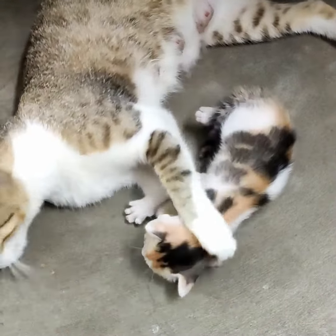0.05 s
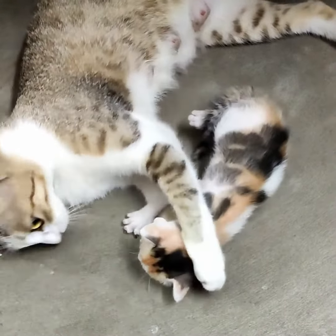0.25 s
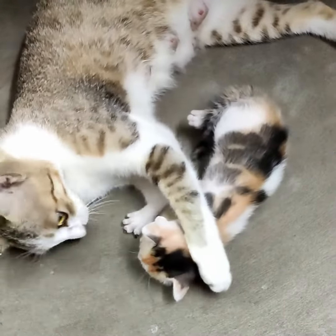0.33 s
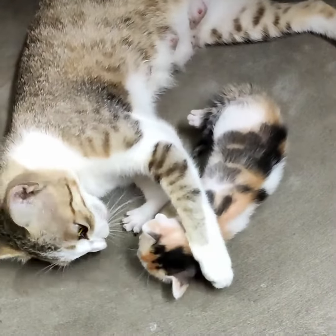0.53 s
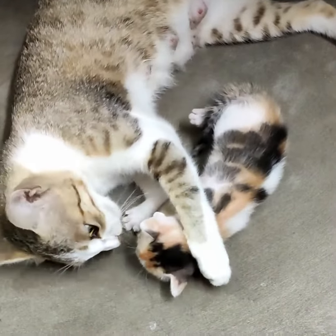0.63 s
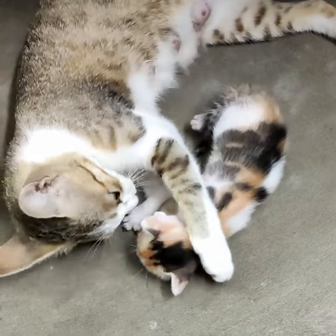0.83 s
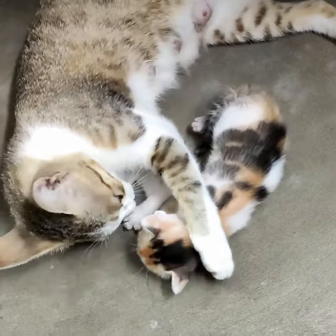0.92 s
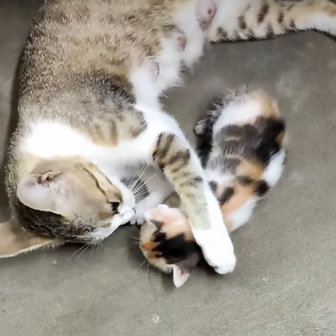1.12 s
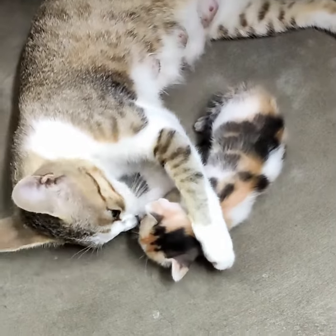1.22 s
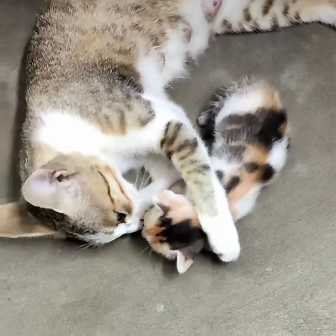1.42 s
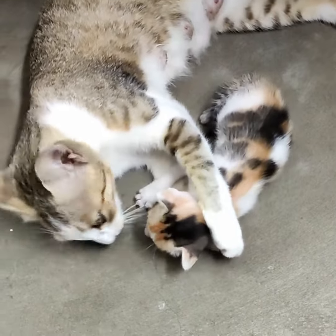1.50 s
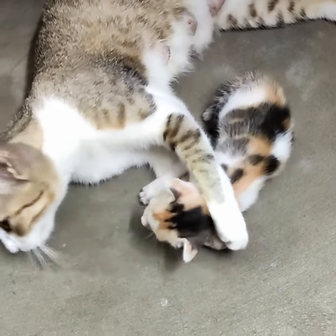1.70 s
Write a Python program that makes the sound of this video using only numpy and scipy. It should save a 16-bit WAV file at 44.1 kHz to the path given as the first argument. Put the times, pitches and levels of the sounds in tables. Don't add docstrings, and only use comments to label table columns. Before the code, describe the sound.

One soft cat greeting, a fluttering closed-mouth trill rising to a brief 'ah', then falling away

```python
import sys
import numpy as np
from scipy import signal
from scipy.fft import rfft, irfft, next_fast_len
from scipy.io import wavfile
from scipy.ndimage import uniform_filter1d, map_coordinates

SR = 44100
rng = np.random.default_rng(int(sys.argv[2]) if len(sys.argv) > 2 else 0)


def gain_from_db(level_db):
    decades = np.asarray(level_db, float) / 20
    return 10 ** decades


def file_out(sig):
    cols = np.atleast_2d(sig).T
    lim = np.clip(cols, -1, 1)
    pcm = np.round(lim * 32767).astype(np.int16)
    wavfile.write(sys.argv[1], SR, pcm)


N = 77175

STEADY_FROM_S, STEADY_TO_S, SETTLE_S = .378, .8, .018

# t/s, pitch f/Hz, level/dB, mouth opening/0-1, tilt/dB per octave
TRILL = [
    (.085, 450, -60, 0.2, -10.5),
    (.103, 445.1, -44, 0.2, -17),
    (.135, 441.2, -44.5, 0.06, -3),
    (.17, 447.3, -43, 0.06, -4.5),
    (.195, 445, -43, 0, -3.5),
    (.22, 458, -38, 0.1, -0.5),
    (.27, 457.8, -38.5, 0.07, 2),
    (.32, 462.4, -37.5, 0.05, 0),
    (.35, 466.3, -37.5, 0.08, -0.5),
]
HUM = [
    (0.376, 475, -35.5, 0.0055, 0.5),
    (0.403, 502.7, -28, 0.03, 3),
    (.43, 522.7, -28.5, 0, 1.5),
    (0.473, 535.6, -27, 0.0053, 2.5),
    (.488, 534.7, -36, 0.0055, 9.5),
    (0.502, 536.3, -41, 0.00072, -5),
    (.52, 548, -44, .05, -8),
]
OPEN = [
    (.535, 574.4, -45.5, 0.45, -7),
    (.555, 584, -41, 0.68, -1.5),
    (.567, 600.4, -34, 0.78, -3),
    (0.575, 609, -26, 0.97, -1),
    (.583, 614.4, -23, 1, -2),
    (.601, 612, -29, 0.96, -3),
    (.611, 591.5, -35, 0.78, -2),
    (.622, 588.4, -37, 0.85, 1.5),
    (0.646, 585.3, -45, 0.55, -11),
]
CLOSE = [
    (.663, 572, -37, 0.26, -1),
    (0.711, 545.2, -35.5, 0.2, -3.5),
    (0.757, 527.5, -36, 0.052, -3),
    (0.769, 520, -41, 0.028, -6),
    (0.795, 500, -41, 0.035, -2),
    (0.808, 492, -38, 0.029, -11),
    (.828, 440, -47, 0.017, -7),
    (.856, 440, -56, 0, -14),
    (.88, 505, -53, 0, -14),
]


def mother():
    t = np.arange(N) / SR
    pitch, level_db, mouth, tilt_db = curves(TRILL + HUM + OPEN + CLOSE)
    mouth = np.clip(mouth, 0, 1)
    steady = np.clip(np.minimum(t - STEADY_FROM_S, STEADY_TO_S - t) / SETTLE_S + .5, 0, 1)
    calm = np.minimum(steady, np.clip((t - STEADY_FROM_S) / .016, 0, 1))
    bursts = throat_flaps(t)
    gap_db = -8.5
    gate = steady + (1 - steady) * np.hypot(gain_from_db(gap_db), bursts)

    faint_db, faint_shakes = -36, .3
    shaky = 1 + faint_shakes * steady * np.clip(faint_db - level_db, 0, None)
    jitter, trill_jitter, flap_bend = .003, .026, .07
    sag = flap_bend * (np.minimum(bursts, 1) - 1)
    rolled = (1 - steady) * (sag + trill_jitter * wobble(150))
    pitch = pitch * (1 + jitter * shaky * wobble(91.1) + rolled)
    phase = 2 * np.pi * np.cumsum(pitch) / SR

    veil_db, unveil_s = -8, .09
    veil_db = veil_db * steady * np.clip(1 - (t - STEADY_FROM_S) / unveil_s, 0, 1)
    shimmer_db = 1.1
    phase_spread = 1.4
    overtone_chop = 2.1
    tones, power = np.zeros(N), np.zeros(N)
    for k in range(1, 15):
        db = mouth_db(k, pitch, mouth, t, calm, veil_db) + tilt_db * np.log2(min(k, 3))
        gain = gain_from_db(db + shimmer_db * shaky * wobble(59.7))
        chopped = gate ** (overtone_chop if k > 1 else 1)
        tones = tones + gain * chopped * np.cos(k * phase - phase_spread * k * k)
        power = power + gain ** 2 / 2
    voice = tones / np.sqrt(uniform_filter1d(power, size=600))

    shut_breath_db = -27.5
    open_breath_db = -23 + (level_db.max() - level_db)
    steady_breath_db = (1 - mouth) * shut_breath_db + mouth * open_breath_db
    rolled_breath_db = -8.5 - 10.0 * (t > STEADY_TO_S - SETTLE_S)
    share = gain_from_db(calm * steady_breath_db + (1 - calm) * rolled_breath_db)
    sounding = (t > TRILL[0][0]) * (t < CLOSE[-1][0])
    return gain_from_db(level_db) * sounding * (voice + share * gate ** 0.11 * breath(phase, mouth))


# t/s of each burst, level/dB, half length/s
FLAPS = [(0.112, 2, 0.0079), (0.135, -1.5, 0.0049), (0.151, 0, 0.0048), (0.17, 2, 0.00695),
         (.203, -3, 0.00489), (.217, 0.5, 0.00599), (0.247, 1, .0045), (0.272, -0.5, 0.00504),
         (.294, 1, 0.00503), (0.320, 1.5, 0.00449), (0.344, 1.5, 0.0052), (.369, 1, 0.00603),
         (0.807, 0, .005), (0.821, 0, 0.0027), (.862, -2.5, .004), (0.870, 3, .004)]


def throat_flaps(t):
    return sum(gain_from_db(db) * np.exp(-.5 * ((t - s) / half_s) ** 2) for s, db, half_s in FLAPS)


# f/Hz, level/dB
SHUT = [(400, 0.5), (540, -10.5), (1000, 0), (1400, -19), (1850, -9), (2400, -34), (3700, -38.5),
        (5400, -54.5)]
# f/Hz, level/dB
WIDE = [(600, -18), (1200, -6.5), (1800, -9.5), (2500, 3.5), (3500, -2.5), (4900, -27.5), (6900, -28.5),
        (8600, -45)]
# t/s, frequency shift/ratio
TONGUE = [
    (.55, 0.97),
    (.575, 1),
    (.6, 1.02),
    (.618, 1.13),
    (.64, 1.03),
    (.67, 1),
]


def mouth_db(k, pitch, mouth, t, calm, veil_db):
    hz = k * pitch
    hum_clears_db = -12.5
    shut_db = along(SHUT, hz) + (k in (3, 4)) * calm * hum_clears_db + (k > 4) * veil_db
    fizz_hz, fizz_width_hz = 4550, 400
    fizz_db = 13 * np.interp(t, (.38, .46), [1, 0])
    shut_db = shut_db + fizz_db * np.exp(-.5 * ((hz - fizz_hz) / fizz_width_hz) ** 2)
    (shift,) = curves(TONGUE)
    wide_db = along(WIDE, hz / (shift if k > 3 else 1))
    return (1 - mouth) * shut_db + mouth * wide_db


# f/Hz, level/dB per Hz
NOSE = [(190, -40.5), (330, 3.5), (750, 0.5), (1300, 2.5), (1900, -5), (2600, -27.5), (4700, -12.5),
        (5600, -34)]
# f/Hz, level/dB per Hz
PANT = [(400, -26), (1400, -5), (2000, -16.5), (3000, 1), (4200, -5), (5500, -18), (7300, -11), (8600, -29)]


def breath(phase, mouth):
    def coloured(air, points):
        ends = [(100, -65.5)] + points + [(10000, -82.5)]
        return unit(filtered(air, lambda hz: gain_from_db(along(ends, hz))))

    air = rng.standard_normal((2, N)) * (1 + np.cos(phase))
    return (1 - mouth) * coloured(air[0], NOSE) + mouth * coloured(air[1], PANT)


# t/s, pitch f/Hz, level/dB
KITTEN = [
    (.11, 1260, -76),
    (.125, 1217, -56),
    (.15, 1192, -55),
    (.205, 1230, -51),
    (.25, 1265, -58),
    (.29, 1248, -58),
    (.325, 1216, -56),
    (.34, 1200, -82),
]
KITTEN_DB = [3, -2.5, -7.5]


def kitten():
    pitch, level_db = curves(KITTEN)
    dulling_db_per_s = 39
    fade_db = dulling_db_per_s * (np.arange(N) / SR - KITTEN[0][0])
    phase = 2 * np.pi * np.cumsum(pitch * (1 + 0.0091 * wobble(50))) / SR
    tones = sum(gain_from_db(db - (k > 1) * fade_db) * np.sin((k + 1) * phase) for k, db in enumerate(KITTEN_DB))
    return gain_from_db(level_db + 1.5 * wobble(40)) * (level_db > -79) * tones


# t/s, level/dB, rise/s, t60/s
SMACKS = [
    (.5195, -39.5, .0005, 0.016),
]
# f/Hz, level/dB per Hz
SMACK = [(800, -6), (1500, -0.5), (2200, -7.5), (3300, 0.5), (5200, -5.5), (6200, -20), (9000, -35.5)]
# t/s, level/dB, rise/s, t60/s
LIP_AIR = [
    (.521, -53, 0.0047, 0.12),
]
# f/Hz, level/dB per Hz
HISS = [(1000, -11.5), (3000, -6.5), (5500, -10), (6900, 0.5), (8100, -21.5), (10000, -20), (12500, -13),
        (15500, -13.5)]


def lips():
    return puffs(SMACKS, SMACK) + puffs(LIP_AIR, HISS)


# t/s, level/dB, rise/s, t60/s
BRUSHES = [
    (1.177, -49.5, 0.0012, .03),
    (1.182, -52.5, 0.0073, 0.11),
    (1.42, -55.5, 0.032, .3),
]
# f/Hz, level/dB per Hz
FUR = [(800, -27), (2000, 2.5), (4000, -1.5), (6800, 0.5), (8000, -22), (15000, -26)]


def fur():
    return puffs(BRUSHES, FUR)


def puffs(rows, spectrum):
    t = np.arange(N) / SR
    shape = np.zeros(N)
    for s, db, rise_s, t60_s in rows:
        age = np.maximum(t - s, 0)
        shape = shape + gain_from_db(db - 60 * age / t60_s) * (1 - np.exp(-age / rise_s))
    noise = filtered(rng.standard_normal(N), lambda hz: gain_from_db(along(spectrum, hz)))
    return shape * gain_from_db(1.5 * wobble(300)) * unit(noise)


# f/Hz, t60/s
ROOM = [(300, .3), (1500, 0.39), (3200, 0.21), (7000, 0.51)]
# f/Hz, level/dB
ROOM_COLOUR = [(400, -4), (1100, -6), (2200, 0), (8000, 0)]


def room(x):
    _, t, z = signal.stft(rng.standard_normal((2, SR // 2)), SR, nperseg=256)
    hz = np.fft.rfftfreq(256, 1 / SR)
    tail = signal.istft(z * gain_from_db(-60 * t / along(ROOM, hz)[:, None]), SR, nperseg=256)[1]
    tail = tail / np.linalg.norm(tail, axis=1, keepdims=True)
    late = np.pad(x, (int(.004 * SR), 0))[None]
    wet = signal.fftconvolve(late, tail, axes=1)[:, :N]
    return filtered(wet, lambda hz: gain_from_db(along(ROOM_COLOUR, hz)))


# f/Hz, level/dB per Hz
AIR = [(150, -20.5), (230, -13), (400, -6.5), (1300, -11.5), (2500, -20), (7000, -30), (7800, -40),
       (15500, -54)]
# f/Hz, level/dB per Hz
RUMBLE = [(18, -3), (28, -0.5), (48, -6), (80, 0), (120, -6), (170, -0.5), (210, -5), (300, -31.5)]


def background():
    air_db, rumble_db, air_lag_s = -54, -63, .00037
    hiss = gain_from_db(air_db + 0.43 * wobble(4.5)) * rush(AIR, air_lag_s, patchy_db=1.5)
    rumble = gain_from_db(rumble_db + wobble(6.6)) * rush(RUMBLE, 0, patchy_db=1.0)
    return hiss + rumble + drone()


# f/Hz, correlation/0-1
ALIKE = [(60, 1), (200, 0.92), (600, .7), (1700, 0.17), (5000, 0.13), (15000, 0.067)]
# f/Hz, left over right level/dB
LEAN = [(60, 2.5), (300, -1.5), (1000, 2), (4000, 4), (10000, 1.5)]


def rush(spectrum, lag_s, patchy_db):
    z = signal.stft(rng.standard_normal((2, N)), nperseg=512)[2]
    field = uniform_filter1d(uniform_filter1d(rng.standard_normal(z.shape[1:]), 6, 0), 12, 1)
    pair = signal.istft(z * gain_from_db(patchy_db * unit(field)), nperseg=512)[1][:, :N]

    def mid_side(hz):
        angle = np.arccos(np.clip(along(ALIKE, hz), -1, 1)) / 2
        return gain_from_db(along(spectrum, hz)) * [np.cos(angle), np.sin(angle)]

    mid, side = filtered(pair, mid_side)
    return unit(placed(np.array([mid + side, mid - side]), LEAN, lambda hz: 2 * np.pi * hz * lag_s))


# f/Hz, level/dB
DRONE = [(80, -71.5), (167, -72.5)]


def drone():
    t = np.arange(N) / SR
    hum = np.zeros(N)
    for hz, db in DRONE:
        level = np.sqrt(2) * gain_from_db(db + 3.3 * wobble(6.45))
        hum = hum + level * np.sin(2 * np.pi * hz * t + 0.52 * wobble(9.8))
    return hum


def unit(x):
    return x / np.sqrt(np.mean(x ** 2) + 1e-20)


def along(points, hz):
    f, v = np.transpose(points)
    return np.interp(np.log(hz + 1), np.log(f + 1), v)


def curves(rows):
    s, *cols = np.transpose(rows)
    return [np.interp(np.arange(N) / SR, s, c) for c in cols]


def wobble(rate):
    knots = rng.standard_normal(int(N * rate / SR) + 4)
    return map_coordinates(knots, [np.arange(N) * rate / SR])


def filtered(x, response):
    m = next_fast_len(N + 8192)
    return irfft(rfft(x, m) * response(np.fft.rfftfreq(m, 1 / SR)), m)[..., :N]


def placed(pair, lean, turn):
    side = np.array([[.5], [-.5]])
    return filtered(pair, lambda hz: gain_from_db(side * along(lean, hz)) * np.exp(-1j * turn(hz) * side))


# f/Hz, left over right level/dB
CAT_LEAN = [(500, 2.5), (1100, 1.5), (1800, -1.5), (2500, -1.5), (3060, 12), (3700, 7), (6000, 6),
            (9000, 2.5)]
# f/Hz, left lag/rad
CAT_TURN = [(250, .2), (550, 0.36), (1100, 1.02), (2400, 1.4), (4000, 1.2), (9000, 2.15)]


def scene():
    cats = mother() + kitten() + lips() + fur()
    direct = placed(np.array([cats, cats]), CAT_LEAN, lambda hz: along(CAT_TURN, hz))
    room_db = -4
    return direct + gain_from_db(room_db) * room(cats) + background()


def roll_off(x):
    return signal.sosfilt(signal.butter(12, 15630, fs=SR, output="sos"), x)


def record(dry):
    return roll_off(dry)


dry = scene()
out = record(dry)
file_out(out)
```